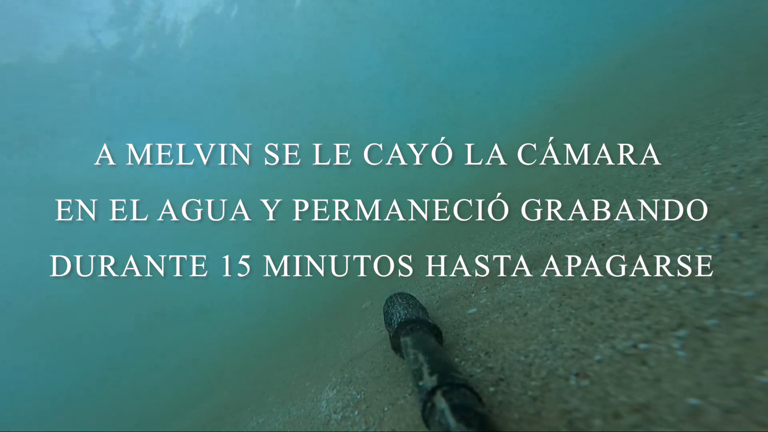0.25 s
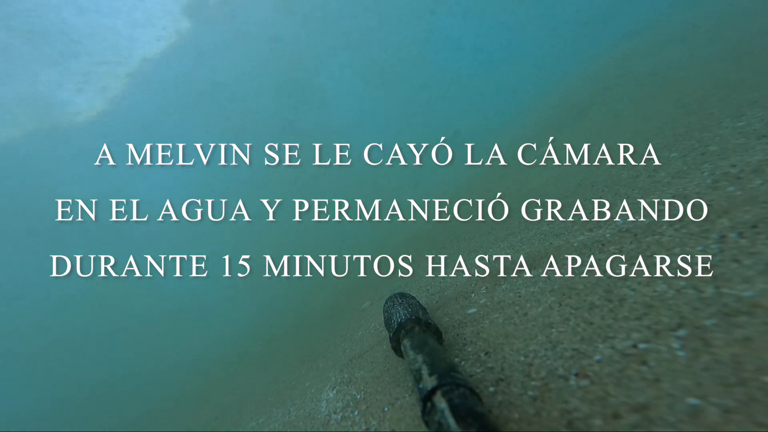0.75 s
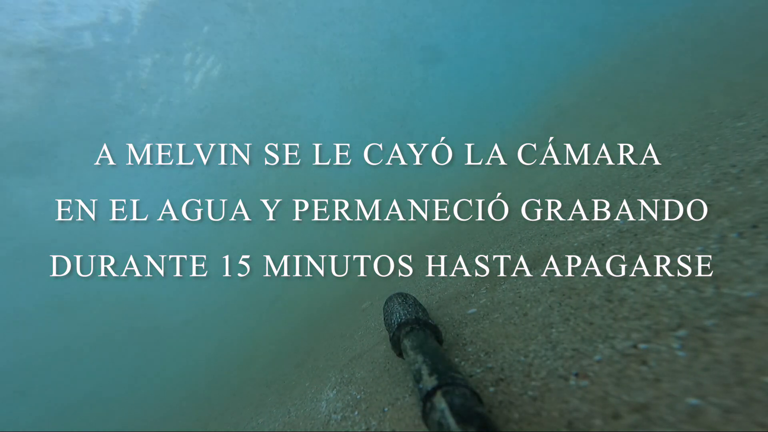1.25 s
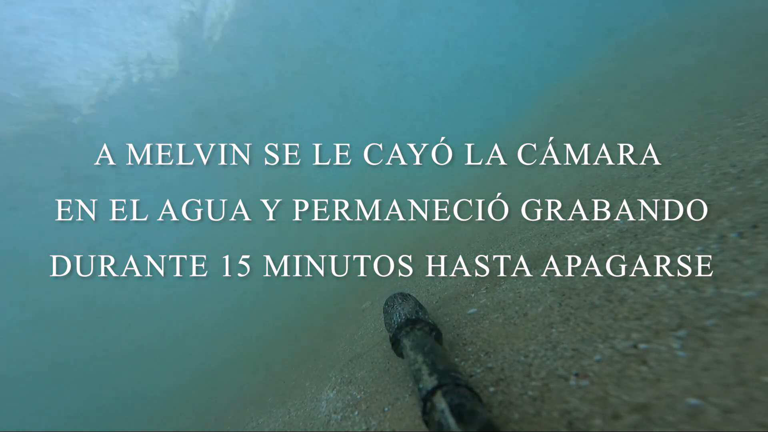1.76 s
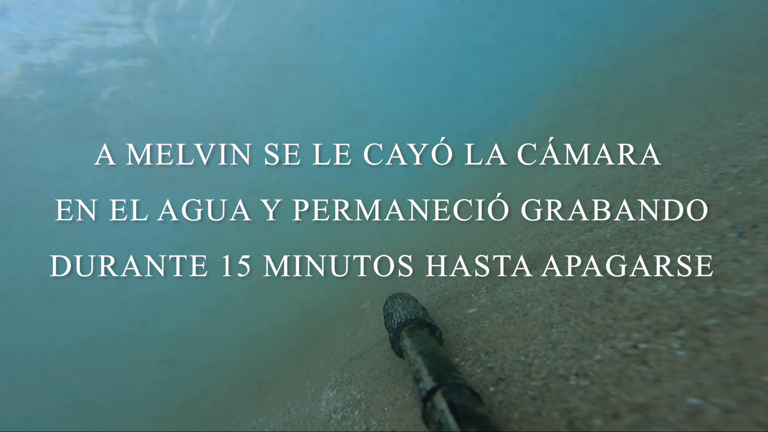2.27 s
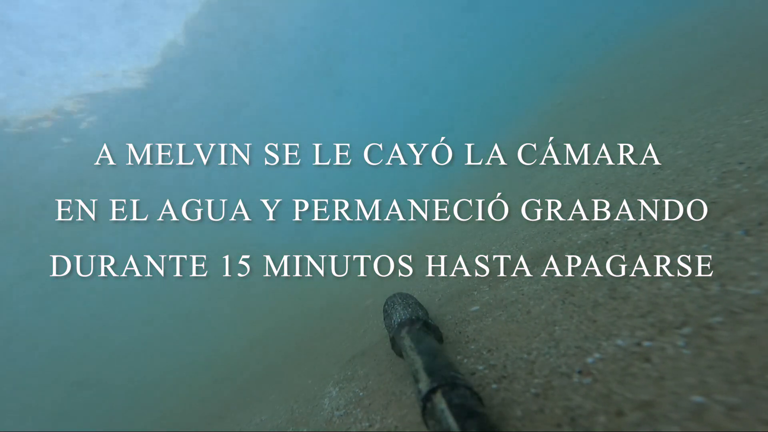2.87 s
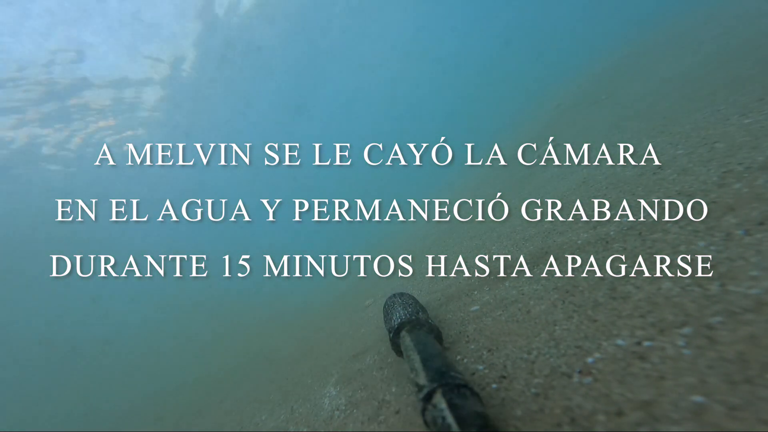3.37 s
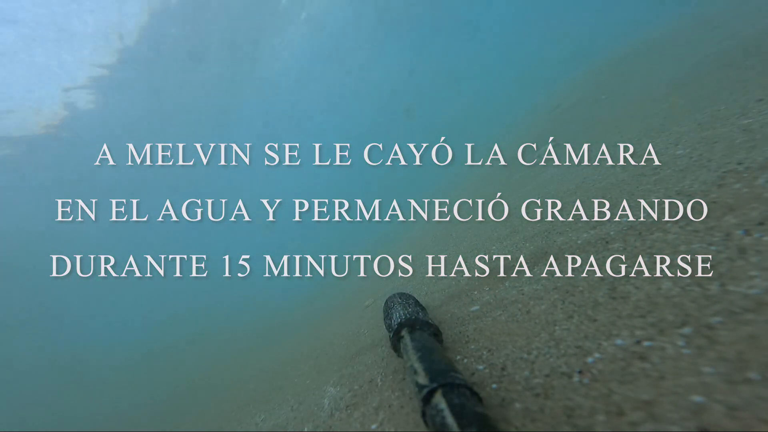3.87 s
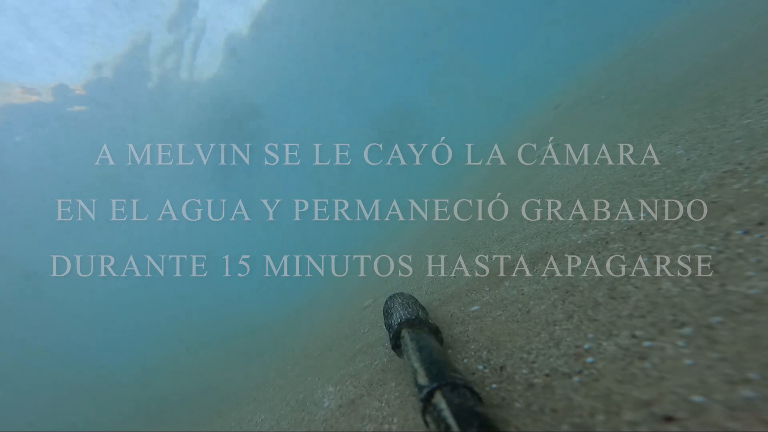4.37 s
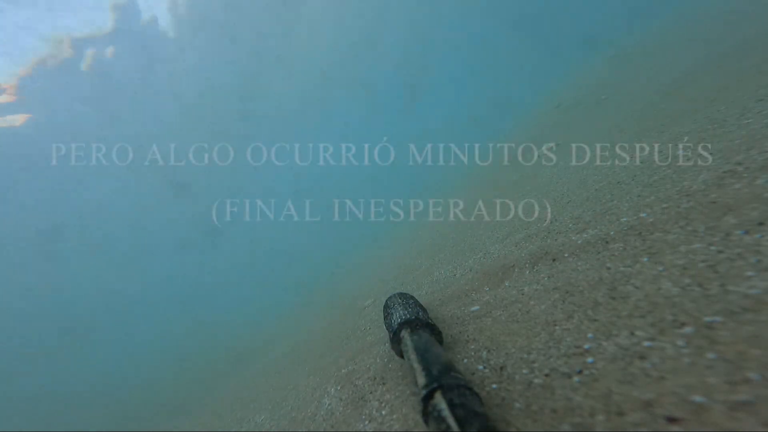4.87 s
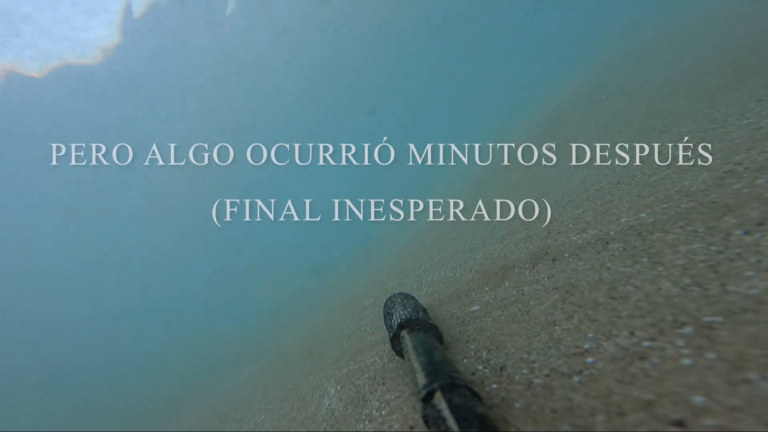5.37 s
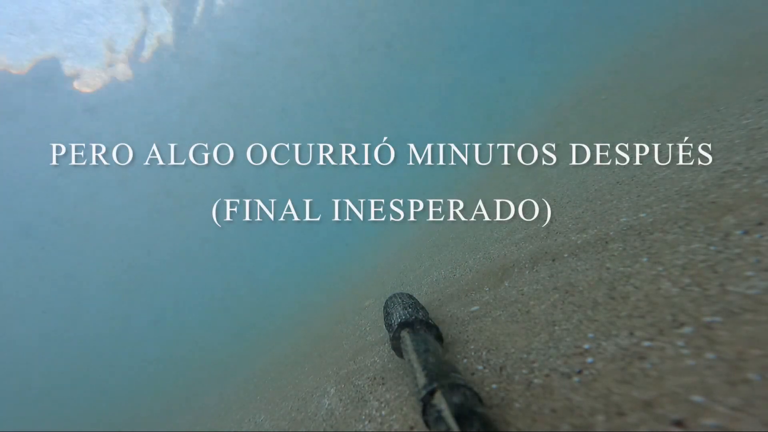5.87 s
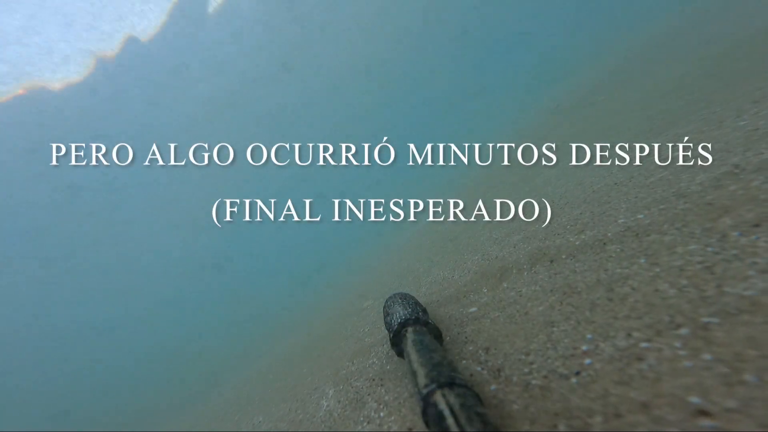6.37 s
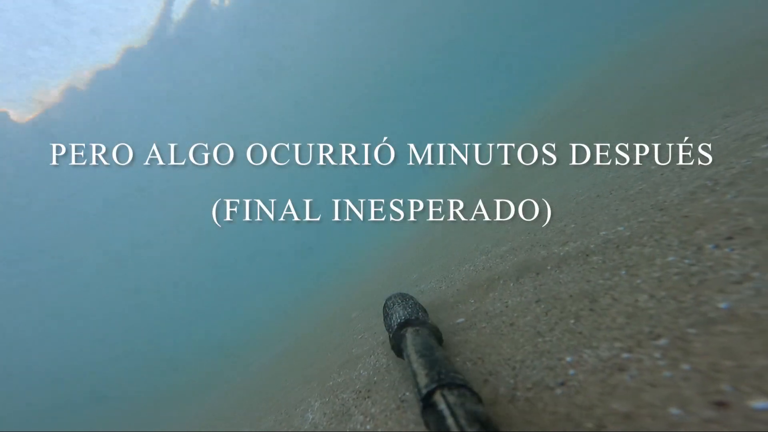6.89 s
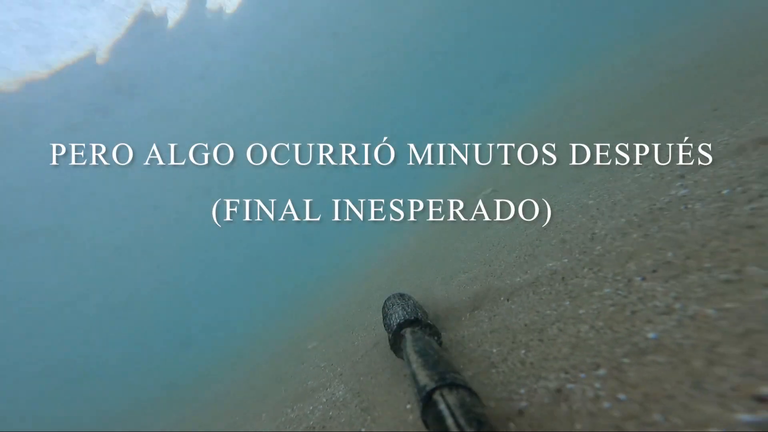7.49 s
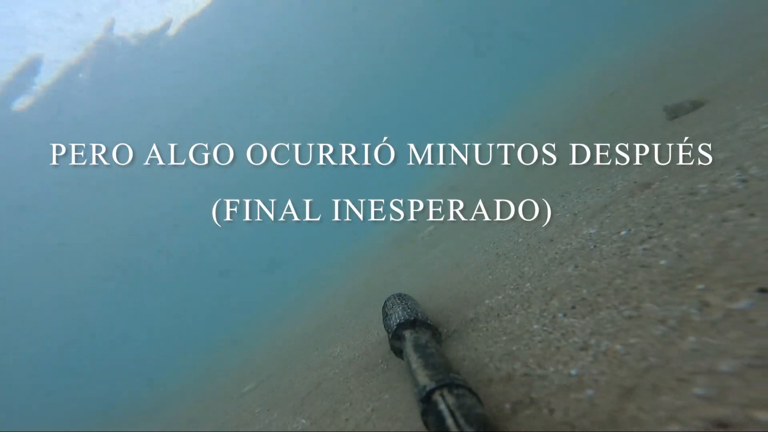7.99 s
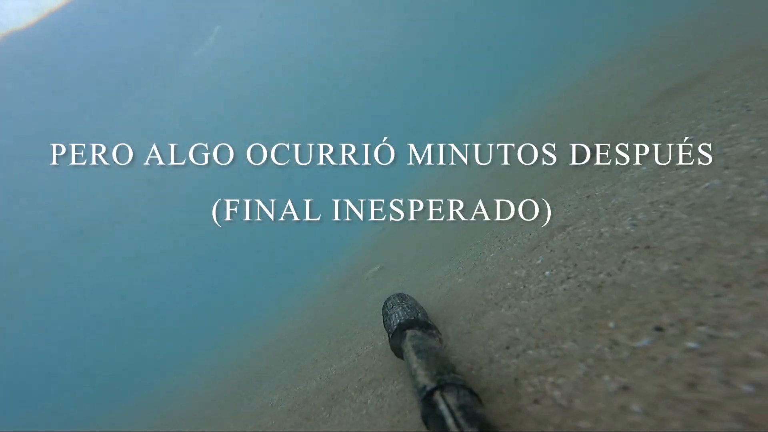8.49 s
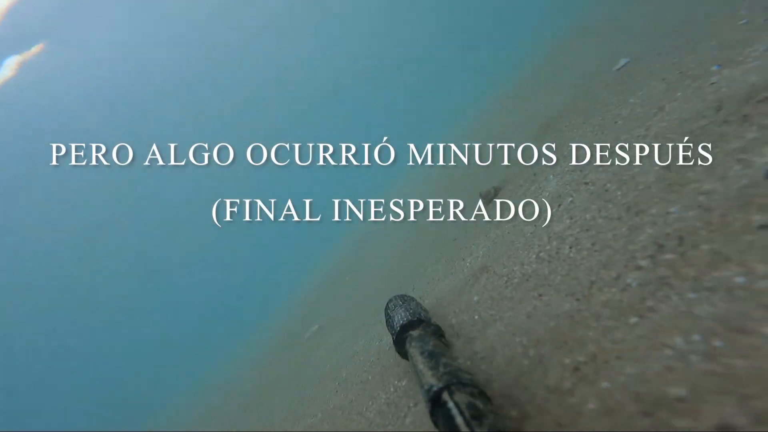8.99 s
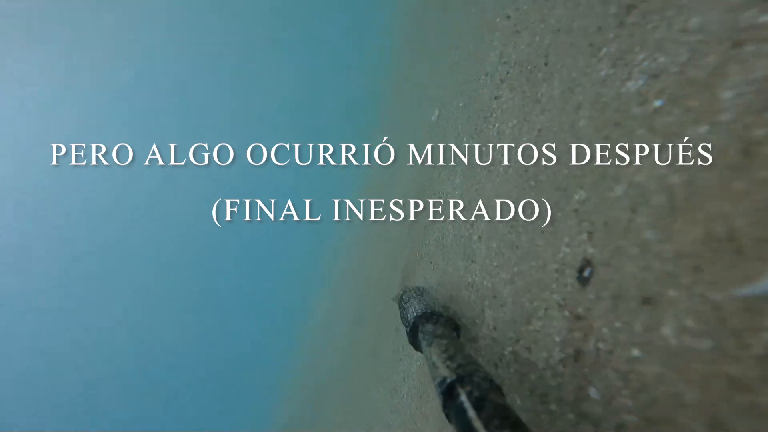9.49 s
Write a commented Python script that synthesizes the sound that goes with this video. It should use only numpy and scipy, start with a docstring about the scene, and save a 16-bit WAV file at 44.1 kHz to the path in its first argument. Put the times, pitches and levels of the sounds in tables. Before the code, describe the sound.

The microphone sits in a sealed case on sand under shallow surf, so everything is close, dull and resonant. At 0 s a low roar of large bubbles fades over deep rocking pressure; soft swells and tiny high blips surface until about 1 s. From 1.8 s a small wave breaks on the right, its bubbles rising in pitch and peaking near 2.6 s with a low surge, then fizzing away. A gurgle sinks in pitch around 3.5 s, with heavy thumps at 3.6-3.7 s and weaker ones at 4.2-4.6 s. A near-quiet lull follows, with faint knocks at 5.4 and 6.2 s. From 6.5 s a bigger wave floods in: rumbling eddies, dense foam and hissing sand, with knocks at 6.9, clustered around 7.5, and 8.4 s. From 9.3 s the case drags with a rasp and wavering low drone, thumps, and a hard knock at 9.5 s as it tips; the rush continues to the end.

```python
"""Bubbles roar and die away, a small wave breaks to the right and deep thumps follow; after a lull a
bigger wave floods in with rumble, foam, hissing sand, knocks and at last a droning, rasping drag.
All is heard through a sealed camera lying on the sand in shallow surf. Bubbles are damped tones that
rise in pitch; foam, sand, eddies and slips are random impacts filtered by water and housing; the swell
is filtered noise with damped thumps, and the judder is a wandering tone."""
import sys
import numpy as np
from scipy import signal
from scipy.fft import rfft, irfft, next_fast_len
from scipy.io import wavfile
from scipy.ndimage import uniform_filter1d

SR = 44100
rng = np.random.default_rng(int(sys.argv[2]) if len(sys.argv) > 2 else 0)


def generate_wav(sig):
    """Save sig (samples, or channels by samples) to the path in sys.argv[1] as 16-bit PCM at SR."""
    pcm = np.round(np.clip(np.atleast_2d(sig).T, -1, 1) * 32767).astype(np.int16)
    wavfile.write(sys.argv[1], SR, pcm)


N = 429534
TIME = np.arange(N) / SR  # s
SIZE = next_fast_len(N + 16384, real=True)  # padded length for filtering, samples
FREQ = np.maximum(np.arange(SIZE // 2 + 1) * SR / SIZE, 1)  # Hz

# strength of the flow over the housing, before wavering and the final rush: t/s, level/dB
FLOW = [(0, -60), (0.3, -66), (0.9, -63.5), (1.3, -66), (2.49, -65.5), (2.66, -55), (3.15, -59.5),
        (3.55, -59), (4.02, -64.5), (5.85, -62), (6.65, -48.5), (6.95, -44), (7.75, -40), (8.7, -40),
        (9.05, -36.5), (9.48, -35.5)]
# small wave breaking to one side, levels before each layer's own offset: t/s, level/dB, centre f/Hz
BREAKER = [(1.8, -53.5, 434), (2.05, -38, 450), (2.2, -39.5, 541), (2.35, -38.5, 685), (2.5, -34, 740),
           (2.64, -29, 842), (2.74, -31, 940), (2.85, -39, 1006), (3.05, -49, 891), (3.3, -56, 696)]
# brief difference between left and right in the low churning: t/s, left minus right/dB
SIDE = [(1.75, 0), (2.1, -2.2), (2.55, -3.6), (2.85, -1.8), (3.4, 0)]
# resonances and dips of the housing: f/Hz, width/Hz, lift/dB
HOUSING = [(204.5, 41, 4), (383, 84, 8.5), (581, 98, 5.5), (1160, 46, 2), (1415, 92, 7.5), (1797, 67, 4.5),
           (1915, 62, -2.5), (2170, 65, -1.5), (2250, 160, 4), (2860, 100, 3.5), (3330, 200, 1),
           (4911, 70, -13), (4890, 90, 9)]
# relative spectrum of fine froth, brighter than coarse foam: f/Hz, level/dB
FROTH_COLOUR = [(40, -7), (200, -3.5), (480, -4.5), (700, 0.5), (880, -9.5), (1080, -2), (1450, -9),
                (1650, -7), (1870, -9), (2100, -18), (3000, -36), (5000, -61)]

FLOOD_DB = -40  # flow level that counts as the full flood
FOAM_SLOPE = 0.77  # dB of foam per dB of flow
DRAG_S = 9.285  # the flood starts to drag the case over the bottom
TIP_S, DIP_WIDTH_S = 9.533, 0.0352  # the case tips over and the wash dips briefly
TIP_RUSH_RISE_S = 0.087  # s per 20 dB


def undb(db):
    """Turn decibels into gain."""
    return 10 ** (np.asarray(db) / 20)


def unit(x):
    """Scale to an rms of 1."""
    return x / np.sqrt(np.mean(x ** 2))


def curve(rows):
    """Join each column of a table by straight lines in time."""
    s, *columns = np.transpose(rows)
    return [np.interp(TIME, s, column) for column in columns]


def walk(rate):
    """Wander smoothly and randomly, about rate steps a second, with an rms of 1."""
    hold = max(int(SR / rate), 2)
    steps = np.repeat(rng.standard_normal(N // hold + 2), hold)
    return unit(uniform_filter1d(steps, hold)[:N])


def onset(s, rise_s):
    """Gain that climbs 20 dB every rise_s, passes one half at time s and levels off at 1."""
    return 1 / (1 + 10 ** np.clip((s - TIME) / rise_s, -10, 10))


def surges(rows):
    """Gain of several surges that each rise, hold and die away; their powers add."""
    gains = []
    for s, length, db, rise, fall in rows:
        gains.append(undb(db) * onset(s, rise) * (1 - onset(s + length, fall)))
    return np.linalg.norm(gains, axis=0)


def pan(x, side_db):
    """Place a sound by its left minus right level."""
    return x * undb(np.array([[1], [-1]]) * side_db / 2)


def colour(x, points, modes=()):
    """Filter with a smooth spectrum and resonant lifts, letting no sound come before its cause."""
    hz, db = np.transpose(points)
    db = np.interp(np.log(FREQ), np.log(hz), db)
    db = db - 20 * np.log10(1 + (10 / FREQ) ** 2)  # fade below 10 Hz
    db = db - 40 * np.log10(np.maximum(FREQ / hz[-1], 1))  # fade above the last point
    for centre, width, lift in modes:
        db = db + lift / (1 + (2 * (FREQ - centre) / width) ** 2)
    # folding the cepstrum forward in time gives the phase of a causal filter
    cepstrum = irfft(np.log(undb(db)), SIZE)
    cepstrum[1:SIZE // 2] *= 2
    cepstrum[SIZE // 2 + 1:] = 0
    return irfft(rfft(x, SIZE) * np.exp(rfft(cepstrum)), SIZE)[:N]


def impacts(rate, spread_db):
    """Random tiny impacts, rate a second, a few much harder than the rest; steady mean power."""
    share = np.clip(rate / SR, 1e-4, 1)
    hit = rng.random(N) < share
    size = undb(spread_db * np.minimum(rng.exponential(size=N), 4))
    return hit * size * rng.choice([-1, 1], N) / np.sqrt(share)


def add(out, s, sound):
    """Mix a short sound in at time s."""
    i = int(np.clip(s * SR, 0, N - 1))
    out[i:i + len(sound)] += sound[:N - i]


def ring(hz, cycles, glide, attack):
    """Damped tone that swells over attack cycles, rises by the share glide and is gone after cycles."""
    turn = np.arange(int(cycles * SR / hz) + 2) * hz / SR
    swelling = 1 - np.exp(-(turn / attack) ** 2)
    envelope = swelling * np.exp(-np.log(300) * turn / cycles)
    return envelope / envelope.max() * np.sin(2 * np.pi * turn * (1 + glide * turn / cycles / 2))


def bubble_swarm(rows, centre_hz, octaves, cycles, spread_db, count):
    """Overlapping bubbles with pitches scattered round a moving centre; rms 1 while they last."""
    out, start, end = np.zeros(N), rows[0][0], rows[-1][0]
    draws = rng.random((count, 2))
    scatter = np.clip(rng.standard_normal((count, 2)), -3, 2.5)
    for (when, sign), (pitch_step, loudness) in zip(draws, scatter):
        s = start + when * (end - start)
        hz = centre_hz[int(np.clip(s * SR, 0, N - 1))] * 2 ** (octaves * pitch_step)
        gain = np.sign(sign - .5) * undb(spread_db * loudness)
        add(out, s, gain * ring(hz, cycles, glide=0.16, attack=0.34))
    return unit(out) * np.sqrt((end - start) * SR / N)


def even(x, size):
    """Even out the swing of an oscillation over size samples; rms 1."""
    power = uniform_filter1d(uniform_filter1d(unit(x) ** 2, size=size), size=size)
    return unit(x / np.sqrt(np.abs(power) + 0.11))


def flutter(x, hz, depth_db, count):
    """Drifting patches of grain sizes: each of count bands flickers on its own, the low ones least."""
    spectrum = rfft(x, SIZE)
    place = np.interp(np.log(FREQ), np.log([500, 4000]), [0, count - 1])
    out = np.zeros(N)
    for k in range(count):
        band = irfft(spectrum * np.maximum(1 - np.abs(place - k), 0), SIZE)[:N]
        depth = depth_db * np.minimum(2 * (k + 1) / count, 1)
        out += band * undb(depth * walk(hz))
    return unit(out)


def dull(x):
    """The sealed case dulls the sharp birth of each bubble."""
    return signal.sosfilt(signal.butter(N=3, Wn=2200 / (SR / 2), output="sos"), x)


def strikes(rows, points, skid_s=0):
    """Blows that ring the housing, either clean or skidding to rest over skid_s."""
    blows, one = np.zeros(N), np.zeros(N)
    one[0] = 1
    t = TIME[:1024]
    for (s, db), rough in zip(rows, rng.standard_normal((len(rows), len(t)))):
        push = rough * np.exp(-t / skid_s) if skid_s > 0 else np.ones(1)
        add(blows, s, undb(db) * push / np.linalg.norm(push))
    # a single clean blow of gain 1 peaks at 1
    return colour(blows, points, HOUSING) / np.abs(colour(one, points, HOUSING)).max()


def flow():
    """Strength of the flow in dB against the full flood; eddies make it waver and tipping adds a rush."""
    rush_db = 5 * onset(TIP_S + 0.076, TIP_RUSH_RISE_S)
    return curve(FLOW)[0] - FLOOD_DB + rush_db + 0.2 * walk(6)


def wash(flow_db):
    """Foam pops and sand grains strike the housing in patches, more densely in stronger flow."""
    # share of fine froth in the foam: t/s, share/0-1
    froth = [(1.2, 0), (2.4, 0), (2.8, 0.82), (3.4, 0.7), (4.1, 0.3), (5.1, 0.46), (5.8, 0.36), (7, 0.79),
             (9.7, 1)]
    # relative spectrum of coarse foam: f/Hz, level/dB
    foam_colour = [(40, -13), (120, -2), (200, -6.5), (300, -2), (480, 0), (720, 1.5), (850, -7.5),
                   (1100, -5), (1490, -6.5), (1600, -15.5), (2000, -12), (2600, -37), (5000, -61.5)]
    # relative spectrum of sand: f/Hz, level/dB
    sand_colour = [(1500, -32.5), (2100, -5.5), (2400, 1.5), (3050, -1.5), (3400, -5), (3750, -13),
                   (4500, -18), (5200, -20), (6000, -39), (7500, -56)]
    density = np.clip(0.67 + flow_db / 32, 0, 1)
    fine = np.clip(curve(froth)[0], 0, 1)
    pops = impacts(2000 + 5000 * density, spread_db=2.0)
    coarse_foam = unit(colour(pops, foam_colour, HOUSING))
    fine_foam = unit(colour(pops, FROTH_COLOUR, HOUSING))
    foam = (1 - fine) * coarse_foam + fine * fine_foam
    sand = colour(impacts(3000 + 12000 * density, spread_db=2.5), sand_colour, HOUSING)
    foam = flutter(foam, hz=30, depth_db=1.25, count=11)
    sand = flutter(sand, hz=30, depth_db=1.25, count=11)
    dip = np.exp(-((TIME - TIP_S) / DIP_WIDTH_S) ** 2)
    foam_db = -27.5 + FOAM_SLOPE * flow_db - 2.0 * fine - 1 * dip
    sand_db = -39.5 + 1.014 * flow_db - 8 * dip
    return foam * undb(foam_db) + sand * undb(sand_db)


def current():
    """Eddies shed by the case beat on it as dull pressure pulses."""
    # waves whose current beats on the case: start t/s, length/s, level/dB, rise/s per 20 dB, fall/s per 20 dB
    waves = [(2.62, 0.2, -22.5, 0.1, 0.38), (4.22, 0.34, -41, 0.3, 0.25), (6.62, 0.85, -20.5, 0.55, 1.0),
             (7.35, 1.64, -16, 0.84, 1.9)]
    # relative spectrum of the eddies: f/Hz, level/dB
    eddy_colour = [(20, -20.5), (50, -6.5), (80, 1.5), (130, -1.5), (175, -2.5), (230, -5.5), (310, -15),
                   (500, -21.5), (900, -37.5), (2000, -69)]
    eddies = colour(impacts(900, spread_db=2.0), eddy_colour)
    return unit(eddies) * surges(waves) * undb(0.27 * walk(6.5))


def swell():
    """Slow pressure rocks the mount with a fairly even swing, and surges shove it as damped thumps."""
    # level of the rocking: t/s, level/dB
    rocking_level = [(0, -28.5), (0.3, -22.5), (0.51, -21.5), (0.57, -32), (0.63, -21.5), (0.86, -19),
                     (1.02, -26), (1.33, -23), (2.3, -30), (2.8, -30), (3.2, -42.5), (3.83, -35),
                     (3.93, -30.5), (4.15, -39.5), (4.5, -32), (4.66, -43), (4.84, -49.5), (5.2, -52),
                     (5.9, -48), (6.5, -35.5)]
    # relative spectrum of the rocking: f/Hz, level/dB
    swell_colour = [(10, -21), (22, -6), (32, -2), (44, 1), (54, -6), (70, -19.5), (110, -35), (250, -60.5)]
    # surges shoving the mount: t/s, peak level/dB, pitch f/Hz
    thumps = [(3.625, -11, 36.8), (3.687, -28, 85), (3.716, -15, 35.3), (3.771, -25, 39.5),
              (4.221, -23.5, 40), (4.26, -23.5, 75), (4.281, -20, 35.6), (4.315, -21, 42), (4.34, -30, 94),
              (4.425, -27, 70), (4.472, -23, 50.3), (4.575, -33, 90), (9.409, -12.5, 66.2),
              (9.517, -12.5, 78.4), (9.622, -11.5, 50.4)]
    rocking = even(colour(rng.standard_normal(N), swell_colour), size=2500)
    out = rocking * undb(curve(rocking_level)[0])
    for s, db, hz in thumps:
        add(out, s, undb(db) * ring(hz, cycles=6.8, glide=0, attack=0.6))
    return out


def cloud():
    """Countless large bubbles merge into a low roar that thins out as the wave passes."""
    # bubble clouds left by the waves: start t/s, length/s, level/dB, rise/s per 20 dB, fall/s per 20 dB
    clouds = [(-0.15, 0.28, -12, 0.2, 0.7), (0.66, 0.16, -25, 0.23, 0.67), (0.95, 2.5, -39, 0.4, 1.1),
              (2.58, 0.22, -25.5, 0.5, 0.42), (5.36, 1.2, -49, 0.1, 1), (6.175, 0.46, -36, 0.03, 0.3)]
    # relative spectrum of the roar: f/Hz, level/dB
    cloud_colour = [(70, -31.5), (110, -9), (170, 0.5), (240, 1), (320, -3), (400, -5), (520, -12),
                    (720, -17), (830, -29.5), (1200, -38), (2000, -60)]
    return unit(colour(impacts(5000, spread_db=1.2), cloud_colour)) * surges(clouds)


def breaker():
    """The crest spills on the right, tearing air into bubbles that shrink until near its end."""
    db, hz = curve(BREAKER)
    spill = bubble_swarm(BREAKER, hz, octaves=0.38, cycles=12.7, spread_db=3.5, count=3000)
    spill = pan(dull(spill) * undb(db - 6.5), -16.0)
    # the spurts lie 2.2 times as far to the side as the low churning
    return spill + pan(dull(spurts()), 2.2 * curve(SIDE)[0])


def spurts():
    """The crest spills in fits, each tearing in a short burst of bubbles."""
    # spurts of air, before the case dulls them: t/s, level/dB, centre f/Hz
    bursts = [(2.04, -36, 460), (2.135, -38.5, 480), (2.245, -45, 780), (2.345, -43.5, 820),
              (2.515, -44, 770), (2.63, -33, 570), (2.79, -39, 480), (3.48, -39.5, 446)]
    length_s = 0.042
    out = np.zeros(N)
    for s, db, hz in bursts:
        span = [(s,), (s + length_s,)]
        centre_hz = np.full(N, hz)
        out += undb(db) * bubble_swarm(span, centre_hz, octaves=0.28, cycles=18, spread_db=2.0, count=40)
    return out


def gurgle():
    """Air dragged down by the breaker wobbles past as a small cloud of bubbles."""
    # the small cloud, 2.5 dB above its final level: t/s, level/dB, centre f/Hz
    rows = [(3.05, -47, 430), (3.35, -39.5, 410), (3.52, -35, 390), (3.7, -39.5, 363), (3.8, -41, 334),
            (4.15, -47, 337)]
    db, hz = curve(rows)
    bubbles = bubble_swarm(rows, hz, octaves=0.528, cycles=18, spread_db=2.5, count=2000)
    return bubbles * undb(db - 2.5)


def drag():
    """Small slips over the bottom ring the lowest housing resonances, more softly once the case tips."""
    # relative spectrum of the slips: f/Hz, level/dB
    drag_colour = [(30, -22.5), (70, -4.5), (140, -26.5), (178, -8.5), (202, -3.5), (240, -5.5),
                   (310, -23.5), (385, -11), (470, -31.5), (590, -10.5), (720, -21), (860, -45)]
    slips = colour(impacts(700, spread_db=1.5), drag_colour, HOUSING)
    eased_db = -5 * onset(TIP_S + DIP_WIDTH_S, TIP_RUSH_RISE_S)
    return even(slips, size=900) * undb(-21 + eased_db) * onset(DRAG_S, rise_s=0.19)


def scrape(flow_db):
    """Sand rasps along the sliding case, harder as the flow grows; it lets up briefly at the tipping."""
    # relative spectrum of the rasp: f/Hz, level/dB
    scrape_colour = [(850, -30), (1120, 6), (1600, -2), (2200, -8.5), (3500, -23), (7000, -48.5)]
    rasp = unit(colour(impacts(6000, spread_db=1.0), scrape_colour, HOUSING))
    lifted = np.exp(-((TIME - TIP_S - DIP_WIDTH_S) / DIP_WIDTH_S) ** 2)
    return rasp * undb(-32.3 + flow_db - 4.7 * lifted) * onset(DRAG_S, rise_s=0.08)


def judder():
    """The mount judders under the pull of the flood: an unsteady drone with two weak overtones."""
    # the drone, with its pitch before jitter: t/s, level/dB, f/Hz
    rows = [(8.7, -72, 207.9), (8.92, -31.5, 208), (9.22, -32, 212.3), (9.34, -19, 213.5),
            (9.43, -19, 202.9), (9.53, -20, 202.5), (9.63, -21.5, 192.4), (9.73, -18.5, 209.5)]
    db, hz = curve(rows)
    unsteady_hz = hz * (1 + 0.05 * walk(70))
    turn = 2 * np.pi * np.cumsum(unsteady_hz) / SR
    tone = np.sin(turn) + undb(-22) * (np.sin(2 * turn) + np.sin(3 * turn))
    return unit(tone * undb(3 * walk(45))) * undb(db)


def knocks():
    """Blows knock on the case and ring it; one is a dull shove from a surge."""
    # knocks, the one at 5.364 s a dull shove from a surge: t/s, peak level of each alone/dB
    blows = [(4.154, -32.5), (5.364, -31), (6.173, -22), (6.905, -18.5), (7.483, -17), (7.496, -13.5),
             (7.534, -13), (7.651, -16), (8.417, -16.5), (9.479, -12), (9.511, -3.5), (9.527, -13.5)]
    # relative spectrum of a knock: f/Hz, level/dB
    knock_colour = [(30, -17.5), (100, -4), (210, 5), (330, -9), (550, -7), (900, -28), (1400, -17),
                    (3000, -43), (8000, -72)]
    return strikes(blows, knock_colour)


def ticks():
    """Coarse grains tick on the case, each skidding to rest within moments."""
    # ticks, set by the strength of the push: t/s, level/dB
    grains = [(0.39, -56.5), (0.4249, -45.5), (0.5841, -50), (1.6896, -51), (4.154, -39), (4.428, -44),
              (4.4365, -43), (6.3111, -35)]
    # relative spectrum of a tick: f/Hz, level/dB
    tick_colour = [(300, -6), (1300, 10), (2400, 2), (5000, -3), (6500, -7), (10000, -35)]
    return strikes(grains, tick_colour, skid_s=0.001)


def blips():
    """Lone bubbles pinch off beside the case, and low, short swells stand out of the roar."""
    # single bubbles close by: t/s, peak level/dB, starting pitch f/Hz
    bubbles = [(0.69, -38.5, 1055), (0.881, -37, 1380), (0.898, -40, 1340), (0.901, -46, 1720),
               (0.992, -45, 1700), (0.995, -29, 1470), (1.43, -43, 1110)]
    # short low swells in the roar: t/s, peak level/dB, starting pitch f/Hz
    low_swells = [(0.221, -17, 215), (0.579, -21, 264), (0.679, -24, 401), (0.84, -22.5, 218),
                  (1.685, -32, 415), (2.61, -18, 165), (2.676, -20, 159), (2.98, -30, 188)]
    out = np.zeros(N)
    for s, db, hz in bubbles:
        add(out, s, undb(db) * ring(hz, cycles=28, glide=0.041, attack=4.74))
    for s, db, hz in low_swells:
        add(out, s, undb(db) * ring(hz, cycles=12, glide=0.08, attack=0.6))
    return out


def plips(flow_db):
    """Small bubbles ring briefly all through the foam."""
    typical_hz = np.full(N, 1399)
    swarm = bubble_swarm(FLOW, typical_hz, octaves=0.5, cycles=24, spread_db=1.9, count=900)
    return unit(colour(swarm, FROTH_COLOUR, HOUSING)) * undb(-42 + FOAM_SLOPE * flow_db)


def grit(flow_db):
    """The finest grains hiss faintly in the flow, and a fine fizz trails the breaker."""
    # relative spectrum of the hiss: f/Hz, level/dB
    grit_colour = [(2500, -14), (3800, -3), (4800, -4), (5600, -6), (6800, -12.5), (8000, -20.5),
                   (10000, -40)]
    hiss = unit(colour(impacts(3500, spread_db=2.0), grit_colour, HOUSING))
    lag_s = 0.05
    fizz_db = -40 + np.interp(TIME - lag_s, TIME, curve(BREAKER)[0])
    return hiss * np.hypot(undb(-67 + 0.39 * flow_db), undb(fizz_db))


def scene():
    """The housing carries nearly everything alike to both sides."""
    flow_db = flow()
    churn = pan(swell() + cloud() + current(), curve(SIDE)[0])
    contact = knocks() + ticks() + drag() + judder() + scrape(flow_db)
    bubbles_and_swells = breaker() + gurgle() + plips(flow_db) + blips()
    return churn + bubbles_and_swells + wash(flow_db) + grit(flow_db) + contact


def record(dry):
    """The camera cuts the treble above 10.7 kHz steeply."""
    return signal.sosfilt(signal.ellip(8, .2, 70, 10700, fs=SR, output="sos"), dry)


dry = scene()
out = record(dry)
generate_wav(out)
```